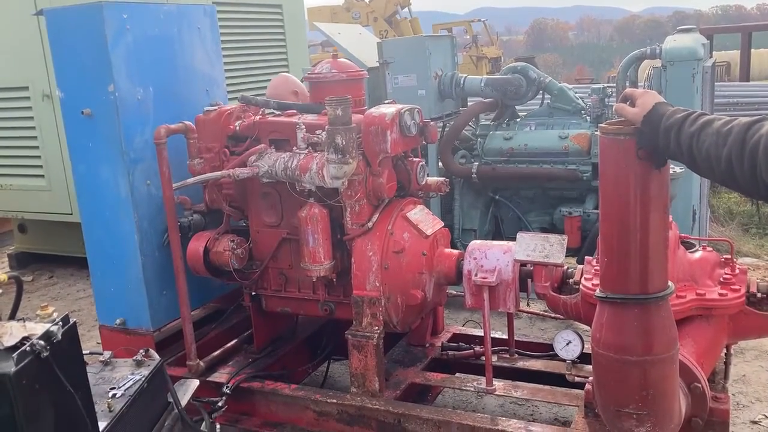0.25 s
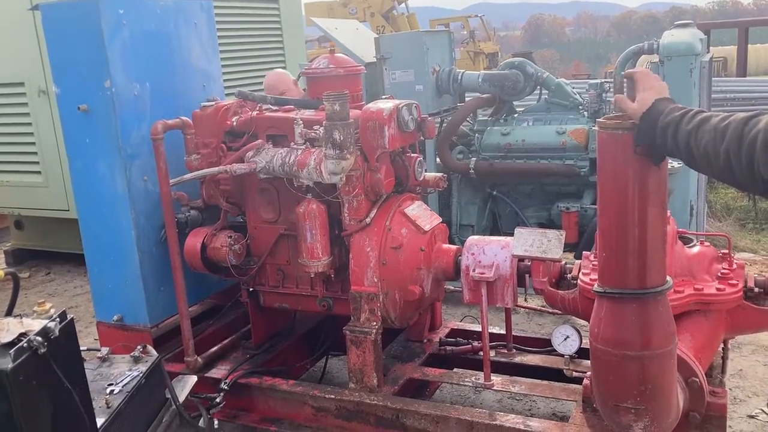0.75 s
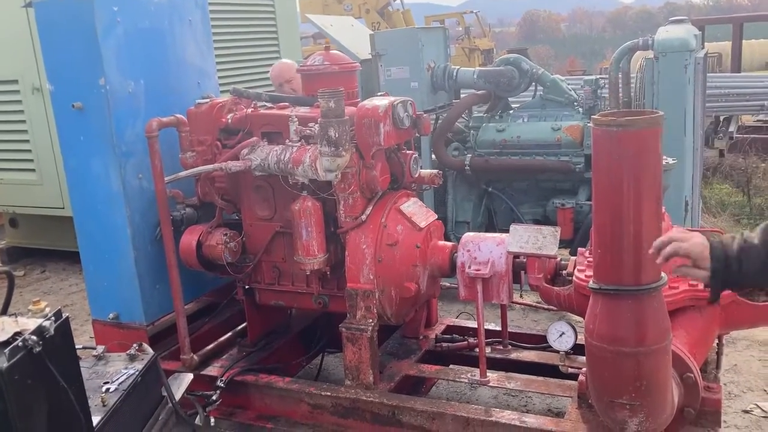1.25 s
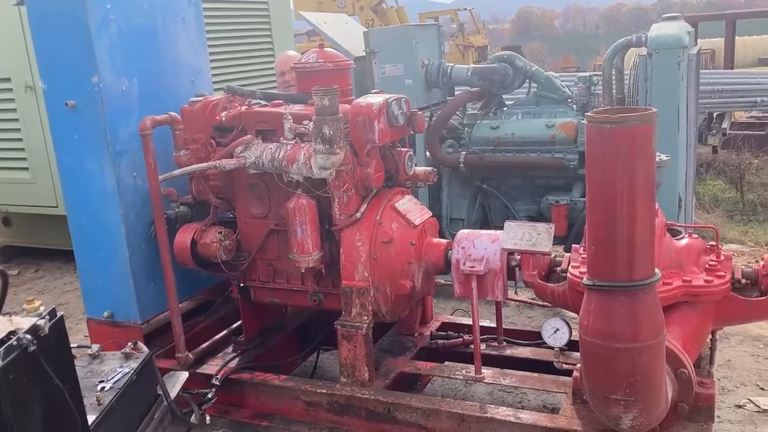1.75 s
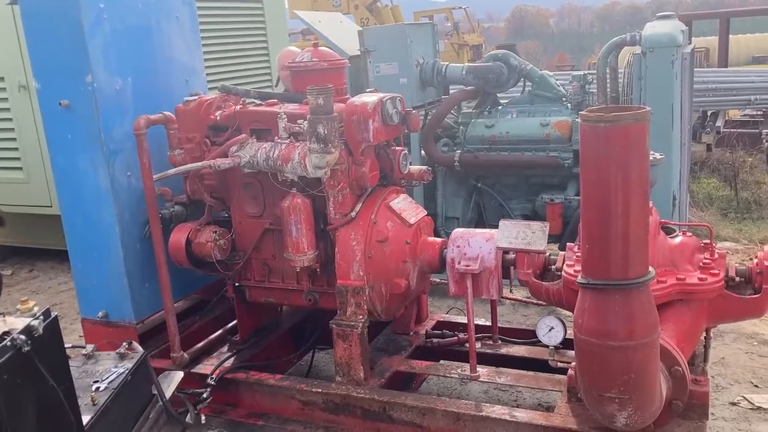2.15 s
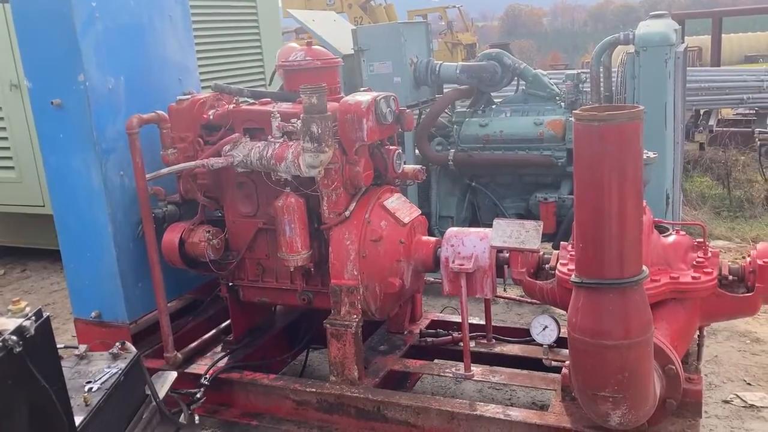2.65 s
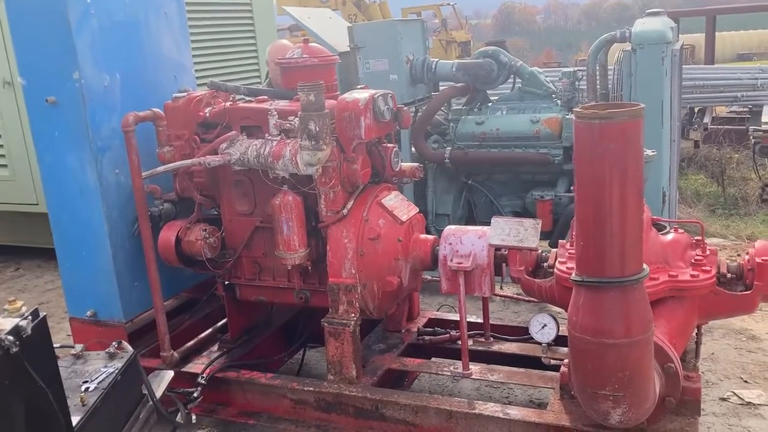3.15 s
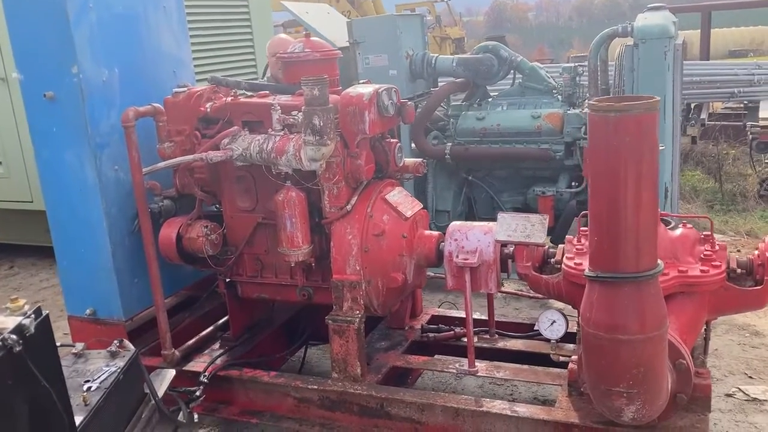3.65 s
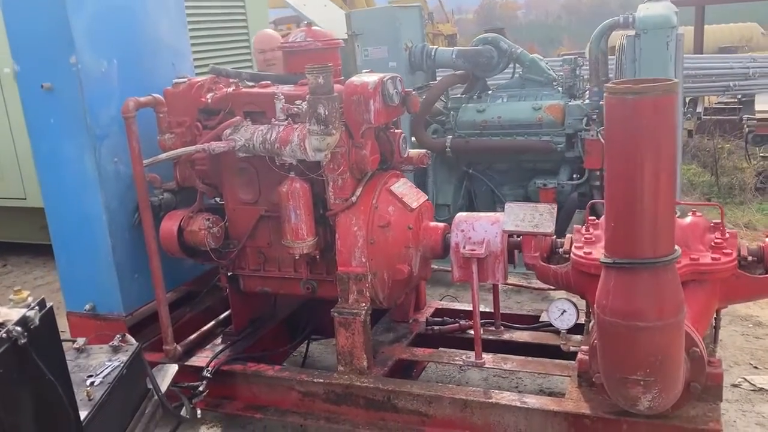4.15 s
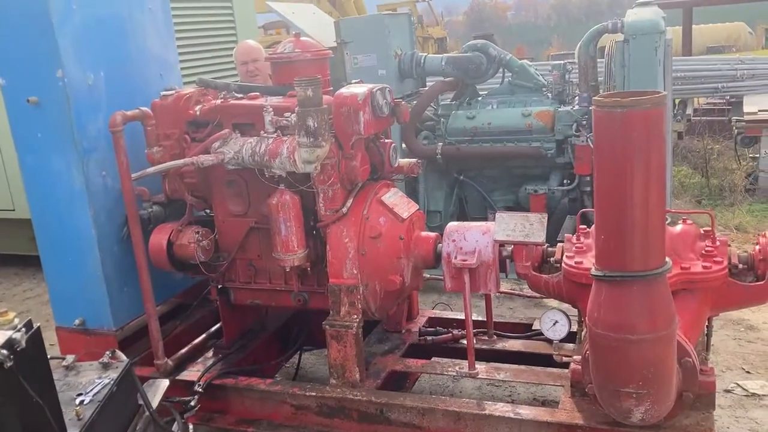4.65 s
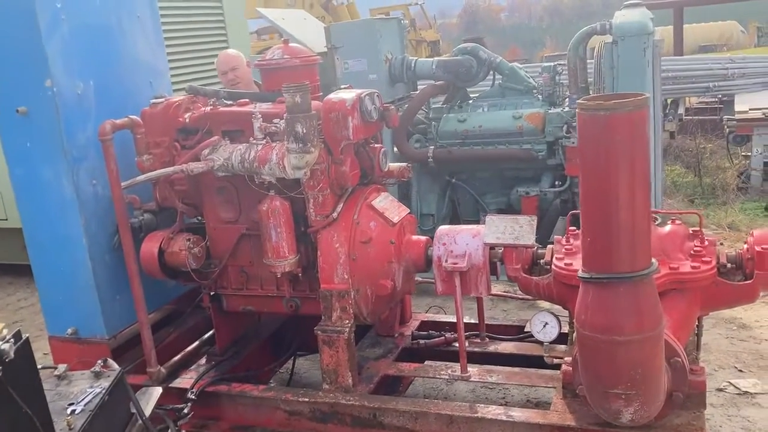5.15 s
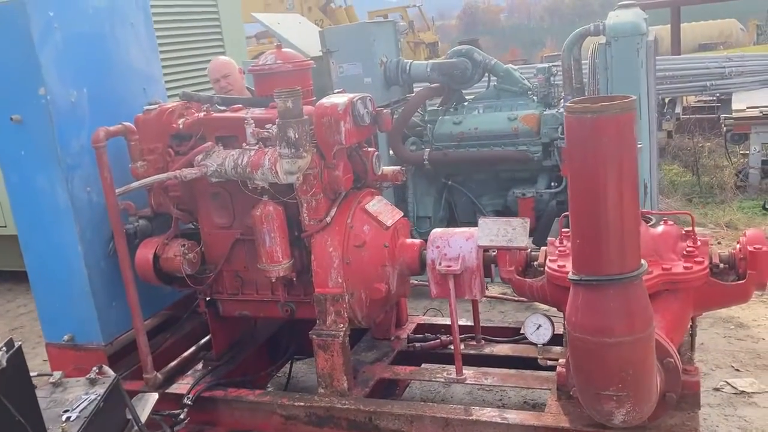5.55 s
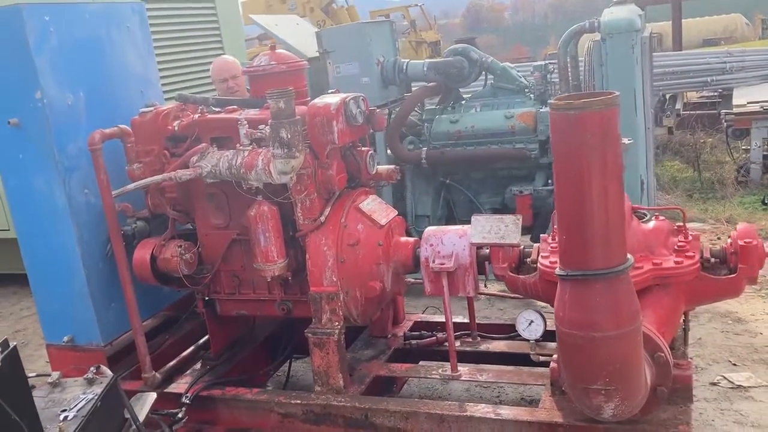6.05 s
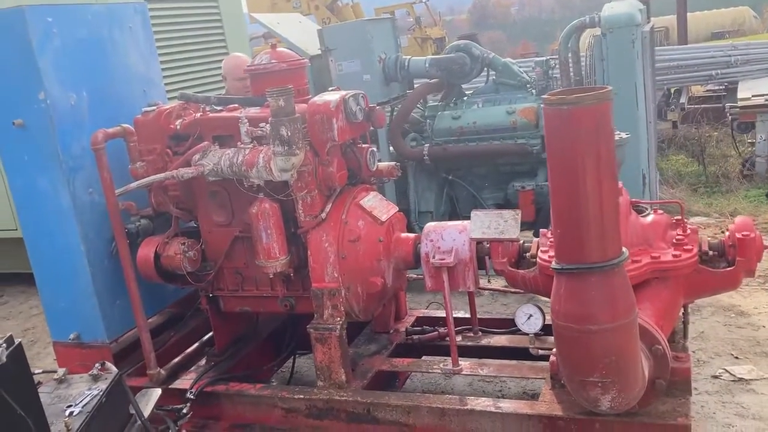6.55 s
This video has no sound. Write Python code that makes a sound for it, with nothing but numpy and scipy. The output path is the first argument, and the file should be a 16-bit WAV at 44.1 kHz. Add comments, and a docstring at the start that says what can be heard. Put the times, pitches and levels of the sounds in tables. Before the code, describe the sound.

A close two-stroke diesel pulls up hard, coasts, is throttled up twice to a higher, barking roar, then begins dropping off.

```python
"""The exhaust of a three-cylinder two-stroke diesel drones and barks, heard close by on a pump skid in an open yard.
It has just caught and pulls up to speed, coasts, is given fuel twice more and coasts again.
Firing pulses drive a pipe filter, knocks ring the block, the geared blower hums and hisses,
and injectors tick sharply under load. Fuel and crank speed set every part's level, crank angle its pitch or rhythm.
One soft low bump is added."""
import sys
import numpy as np
from scipy import signal
from scipy.fft import rfft, irfft, next_fast_len
from scipy.io import wavfile
from scipy.ndimage import uniform_filter1d, map_coordinates

SR = 44100
rng = np.random.default_rng(int(sys.argv[2]) if len(sys.argv) > 2 else 0)


def to_wav(s):
    """Save 16-bit WAV."""
    ch = np.atleast_2d(s).T  # columns
    pcm = np.round(np.clip(ch, -1, 1) * 32767)  # PCM
    wavfile.write(sys.argv[1], SR, pcm.astype(np.int16))


N = 300321
TIME = np.arange(N) / SR

# cylinders: crank angle/turns, knock/dB per unit of (4.5 + load), injector tick/dB
CYLINDERS = [(.0, -3.5, 4.5), (.325, -2, -1), (0.652, -6, -2)]


def from_db(db):
    """Amplitude ratio of a level in dB."""
    return 10 ** (np.asarray(db) / 20)


def rms_one(x):
    """Scale to an overall rms of 1."""
    return x / np.sqrt(np.mean(x ** 2) + 1e-20)


def in_time(rows):
    """Each column of a curve, sample by sample."""
    time_s, *columns = np.transpose(rows)
    return [np.interp(TIME, time_s, column) for column in columns]


def at_hz(points, hz):
    """A curve over frequency, read on a log-frequency axis."""
    point_hz, value = np.array(points).T
    return np.interp(np.log(hz + 1), np.log(point_hz), value)


def evened(x, span_samples=5000):
    """Divide by the moving rms, common to all channels."""
    power = np.mean(np.atleast_2d(x) ** 2, axis=0)
    smooth = uniform_filter1d(uniform_filter1d(power, span_samples), span_samples // 2)
    return x / np.sqrt(smooth + 1e-20)


def cut(x, hz, kind, order=4):
    """Butterworth low- or high-pass."""
    return signal.sosfilt(signal.butter(order, hz, kind, fs=SR, output="sos"), x)


def body(x, spectrum, modes=(), size=8192):
    """Minimum-phase filter: a broad spectrum plus narrow peaks or nulls."""
    hz = np.arange(size // 2 + 1) * SR / size
    db = at_hz(spectrum, hz)
    for mode_hz, width_hz, mode_db in modes:
        db = db + mode_db / (1 + (2 * (hz - mode_hz) / width_hz) ** 2)
    # folding the cepstrum makes the response causal
    cepstrum = irfft(np.log(from_db(db)))
    cepstrum[1:size // 2] *= 2
    cepstrum[size // 2 + 1:] = 0
    response = irfft(np.exp(rfft(cepstrum)))
    return signal.oaconvolve(np.atleast_2d(x), response[None], axes=1)[:, :N]


def stereo_noise(size):
    """White noise whose left-right correlation depends on frequency."""
    # left-right correlation: f/Hz, correlation/0-1
    likeness = [(300, 1), (700, 0.65), (1400, 0.44), (3000, 0.73), (6000, 0.69)]
    mid, side = rfft(rng.standard_normal((2, size)))
    alike = np.clip(at_hz(likeness, np.arange(len(mid)) * SR / size), 0, 1)
    return irfft(np.sqrt(1 + alike) * mid + np.sqrt(1 - alike) * side * [[1], [-1]], size)


def late(x, ms):
    """A short travel delay, to a fraction of a sample."""
    size = next_fast_len(N + 100)
    hz = np.arange(size // 2 + 1) * SR / size
    return irfft(rfft(x, size) * np.exp(-2j * np.pi * hz * ms / 1000), size)[:N]


def drift(knots_per_s, size=2000):
    """Slow chance of spread 1: a spline through random knots."""
    knots = rng.standard_normal(400)
    coarse_s = np.linspace(0, TIME[-1], size)
    wander = map_coordinates(knots, [coarse_s * knots_per_s], order=3, mode="wrap")
    return np.interp(TIME, coarse_s, wander)


def firings(crank, angle_turns, spread_db, jitter_ms):
    """One click a turn at a crank angle, each a little different in strength and time."""
    turns = np.arange(int(crank[-1])) + angle_turns % 1
    chance = rng.standard_normal((len(turns), 2))
    at_s = np.interp(turns, crank, TIME) + chance[:, 0] * jitter_ms / 1000
    clicks = np.zeros(N)
    clicks[np.clip((at_s * SR).astype(int), 0, N - 1)] = from_db(spread_db * chance[:, 1])
    return clicks


def dying(clicks, t60_s):
    """Exponential envelope after each click."""
    return signal.lfilter([1], [1, -from_db(-60 / (t60_s * SR))], clicks + 1e-18)


def loudness(voice, fuel, speed, cruise_turns_per_s=35):
    """Level of a voice in dB: it follows the fuel and tilts with the speed."""
    coasting_db, load_db, slow_db, fast_db = voice
    octaves = np.log2(speed / cruise_turns_per_s)
    return coasting_db + load_db * fuel + np.where(octaves < 0, slow_db, fast_db) * octaves


def exhaust(crank, load, speed, drone_db, bark_db, angle_turns=0.2406, slow_phase_rad=1.0, fast_phase_rad=2.48,
            coast_rough_db=-24, pull_rough_db=-18):
    """Gas pulses and their turbulence pass down the pipe, whose null parts the drone from the bark."""
    # unequal cylinders give every crank order: order/per turn, coasting/dB, pulling/dB
    exhaust_orders = [(1, -2, -32), (2, -1, 0), (3, 11.5, 19.5), (4, 2.5, 0), (5, 7, 6), (6, 5.5, 15),
                      (7, 7.5, 10.5), (8, 13.5, 5.5), (9, 7, 9.5), (10, 1.5, 4), (11, 6.5, 3), (12, -1, -1),
                      (13, -11.5, -4), (14, -10.5, -1), (15, -12.5, -7), (16, -31, 0), (17, -20, -3),
                      (18, -4.5, -1.5), (19, -52, 6), (20, -36, -3)]
    # pipe and silencer: f/Hz, level/dB
    pipe = [(25, -64), (60, -20), (95, -1.5), (140, -7), (200, -5), (280, 4.5), (400, -2.5), (500, -7),
            (650, 0.5), (850, -14.5), (1100, -21.5)]
    # standing waves and nulls of the pipe: f/Hz, width/Hz, level/dB
    pipe_modes = [(113, 13, -7), (153.5, 12.6, 7.5), (205, 37, 8), (250, 37, 6), (312.6, 62, -21),
                  (336.2, 18.2, 11.5), (373, 3.1, 7), (388.8, 4.3, -6.5), (467.7, 117, 11.5),
                  (516, 60, 1.5), (552, 4.6, -60), (596, 19, -20), (585, 57, 6.5), (855, 11, -15)]
    angle_rad = 2 * np.pi * (crank - angle_turns)
    # a slow engine lopes on one strong puff; with speed the in-between orders shift and three puffs share the turn
    shift_rad = np.interp(speed, [26, 34], [slow_phase_rad, fast_phase_rad])
    pulses = 0
    for order, coast_db, pull_db in exhaust_orders:
        in_between = bool(order % len(CYLINDERS))
        level = from_db(coast_db + (pull_db - coast_db) * load)
        pulses = pulses + level * np.cos(order * angle_rad + shift_rad * in_between)
    pulses = rms_one(pulses)
    turbulence = rms_one(cut(rng.standard_normal(N), 670, "low") * (1 + np.abs(pulses)))
    rough = from_db(coast_rough_db + (pull_rough_db - coast_rough_db) * load)
    gas = body(pulses + rough * turbulence, pipe, pipe_modes)[0]
    drone = from_db(drone_db) * evened(cut(gas, 334.0, "low", order=8))
    bark = from_db(bark_db) * evened(cut(gas, 335.3, "high", order=8))
    left = drone * from_db(1.5) + bark * from_db(-2.2)
    right = late(drone * from_db(0.5) + bark * from_db(-2.06), ms=0.14)
    return np.array([left, right])


def boom(load, speed, order=11, mode_hz=374, width_hz=5.2, peak_db=4.5):
    """Extra bark in dB as one crank order crosses a pipe resonance; strong gas flow damps it."""
    detuning = 2 * (order * speed - mode_hz) / width_hz
    return peak_db * (1 - load) / (1 + detuning ** 2)


def block(crank, load, knock_db, ring_t60_s=0.19, crack_t60_s=0.0081, crack_db=8, ring_db=-4, rattle_t60_s=0.27,
          rattle_db=-5, pull_db=9, air_db=-6, gear_pull_db=6, size=4000):
    """Each cylinder rings the casting's dense modes in its own way, harder under load; loose parts rattle after."""
    # casting: f/Hz, level/dB
    casting = [(300, -24.5), (560, -17.5), (660, -1.5), (950, -6.5), (1450, -2), (2000, -11), (2700, -12.5),
               (3100, -13.5), (3900, -13.5), (5000, -15), (6200, -23), (8000, -47), (16000, -41)]
    # ringing of block and covers: f/Hz, width/Hz, level/dB
    casting_modes = [(635, 120, 4), (749, 11.3, -27), (827, 200, 3), (927, 33, 4), (1103.5, 86, 9.5),
                     (1232, 54, -9.5), (1370, 20, 5.5), (1580, 22, -3), (1785.6, 44, -20.5), (1825, 66, 13),
                     (2173, 50, 8), (2330, 33, 5.5), (2567, 44, 8.5), (2720, 40, 9.5), (3595, 100, 3),
                     (4150, 21, 5.5)]
    age_s = np.arange(size) / SR
    decay = from_db(-60 * age_s / ring_t60_s) + from_db(crack_db - 60 * age_s / crack_t60_s)
    ringing, shake = 0, 0
    for angle_turns, db_per_unit, _ in CYLINDERS:
        blows = firings(crank, angle_turns - .04, spread_db=3.5, jitter_ms=0.014)
        blows = blows * from_db(db_per_unit * (4.5 + load))
        ringing = ringing + signal.oaconvolve(blows[None], stereo_noise(size) * decay, axes=1)[:, :N]
        shake = shake + dying(blows, rattle_t60_s)
    noise = stereo_noise(2 * next_fast_len(N // 2 + 1))[:, :N]
    loose = noise * (from_db(rattle_db) * evened(shake) + from_db(air_db))
    knocks = from_db(ring_db + pull_db * load) * evened(ringing)
    gears = from_db(gear_pull_db * load) * gear_train(crank)
    left, right = from_db(knock_db - 0.34) * evened(body(knocks + gears + loose, casting, casting_modes))
    return np.array([left * from_db(2.0), late(right, ms=0.083) * from_db(0.15)])


def gear_train(crank, whirr_db=-7, whine_db=-10.5, waver_db=4.5, size=1200):
    """Gears, blower lobes and valves repeat their contacts every turn: wavering lines glide with the speed."""
    # gears and lobes that sing out: order/per turn, level/dB
    whine_orders = [(17, 5), (18, 1.5), (19, -2.5), (20, -2.5), (21, -0.5), (24, -8), (26, -2.5), (27, -4),
                    (29, 0), (30, -5.5), (31, -7.5), (32, -0.5), (34, -5), (35, -5.5), (38, -2), (41, -7)]
    meshing_rad = 0.74 * drift(2.552)
    whirr = 0
    # two contact patterns, slowly blended
    for blend in np.cos(meshing_rad), np.sin(meshing_rad):
        pattern = stereo_noise(size)
        turned = [np.interp(crank % 1 * size, np.arange(size), side) for side in pattern]
        whirr = whirr + blend * np.array(turned)
    whine = 0
    for order, db in whine_orders:
        level = from_db(db + waver_db * drift(5))
        whine = whine + level * np.cos(2 * np.pi * (order * crank + rng.random()))
    whirr = rms_one(cut(whirr, 2000, "low", order=2))
    return from_db(whirr_db) * whirr + from_db(whine_db) * rms_one(whine)


def injectors(crank, load, injector_db, tick_t60_s=0.0091, coast_tick_db=-7, pull_tick_db=10.5, diffuse_db=-17):
    """A bright noise snap at each firing stands out of the blower hiss as the load rises."""
    # injector tick: f/Hz, level/dB
    tick_spectrum = [(2000, -27), (4000, -25), (6500, -7), (7500, 1), (8400, 6), (9500, -2), (11000, -2.5),
                     (13000, -9.5), (16000, -9)]
    # blower hiss: f/Hz, level/dB
    hiss_spectrum = [(3000, -19), (5500, 3.5), (7600, 9), (11000, 7.5), (13000, 3), (16000, -7)]
    snaps = 0
    for angle_turns, _, tick_db in CYLINDERS:
        snaps = snaps + firings(crank, angle_turns, spread_db=2.5, jitter_ms=0.13) * from_db(tick_db)
    envelope = dying(snaps, tick_t60_s) + 0.22 * dying(snaps, t60_s=0.044) + 0.11
    tick_noise, hiss_noise = rng.standard_normal((2, 3, N))
    ticks = evened(body(tick_noise * envelope, tick_spectrum))
    hiss = rms_one(body(hiss_noise, hiss_spectrum))
    share = from_db(coast_tick_db + (pull_tick_db - coast_tick_db) * load)
    mix = (share * ticks + hiss) / np.sqrt(1 + share ** 2)
    direct, *scattered = from_db(injector_db + 3.5) * mix
    # the treble reaches the left side later and in opposite phase
    return np.array([-late(direct, ms=0.2199), direct]) + from_db(diffuse_db) * np.array(scattered)


def blower(crank, blower_db, waver_db=2, gear_ratio=1.95):
    """Rotors geared up from the crank hum between its orders, beat against the exhaust and coarsen it."""
    # rotor hum: order/per rotor turn, level/dB
    rotor_orders = [(5, 4), (6, 0.5), (7, 2.5), (9, -15), (10, -12), (12, -13), (14, -7)]
    hum = 0
    for order, db in rotor_orders:
        level = from_db(db + waver_db * drift(3.82))
        hum = hum + level * np.cos(2 * np.pi * (order * gear_ratio * crank + rng.random()))
    hum = from_db(blower_db) * rms_one(hum)
    return np.array([hum, late(hum, ms=0.086)])


def bumps(width_s=0.00055):
    """A dull, short Gaussian pressure bump, alike on both sides."""
    # soft low bump: t/s, peak/dB
    bump_rows = [(6.265, -10)]
    return sum(from_db(db) * np.exp(-((TIME - at_s) / width_s) ** 2) for at_s, db in bump_rows)


def scene():
    """Fuel and crank speed drive exhaust, block, injectors and blower together."""
    # crankshaft: t/s, speed/turns per s
    speed_curve = [(0.0, 24.24), (0.72, 33.71), (0.9, 35.51), (1.2, 35.35), (1.52, 35.55), (1.78, 35.29),
                   (2.23, 34.28), (2.61, 33.85), (3.42, 32.38), (3.65, 33.31), (3.99, 37.55), (4.38, 39.25),
                   (4.79, 43.31), (5.16, 44.71), (5.67, 47.66), (5.89, 48.87), (6.05, 48.18), (6.81, 44.73)]
    # fuel rack: t/s, load/1 (0 coasting, 1 full fuel, below 0 shut off)
    fuel_curve = [(0, 0.75), (.84, 0.84), (1.03, -0.15), (1.22, 0.27), (1.56, 0.082), (3.3, 0.007),
                  (3.52, 0.17), (3.69, 0.9), (3.93, 1), (4.11, 0.37), (4.37, .52), (4.49, 0.92),
                  (4.7, 0.84), (4.89, 0.5), (5.27, .68), (5.87, .6), (5.97, 0.18), (6.81, .03)]
    # voices: coasting at cruise speed/dB, added by full load/dB, below cruise/dB per octave, above/dB per octave
    drone_voice = (-23, 6.5, -5, -11)
    bark_voice = (-27, 14.5, 2, 5.5)
    knock_voice = (-28.5, 10.5, -6.5, -4)
    injector_voice = (-47.5, 17.5, -4, 1.5)
    blower_voice = (-40.5, 7, 8, 24.5)
    speed, = in_time(speed_curve)
    fuel, = in_time(fuel_curve)
    load = np.clip(fuel, 0, 1)
    crank = np.cumsum(speed) / SR  # turns
    drone_db = loudness(drone_voice, fuel, speed)
    bark_db = loudness(bark_voice, fuel, speed) + boom(load, speed)
    engine = exhaust(crank, load, speed, drone_db, bark_db)
    engine = engine + block(crank, load, loudness(knock_voice, fuel, speed))
    engine = engine + injectors(crank, load, loudness(injector_voice, fuel, speed))
    engine = engine + blower(crank, loudness(blower_voice, fuel, speed))
    return engine + bumps()


def record(dry, ceiling=.88, cutoff_hz=15900):
    """Clip the highest peaks, then cut the top with a steep low-pass."""
    held = np.clip(dry, -ceiling, ceiling)
    return signal.sosfilt(signal.ellip(10, .2, 80, cutoff_hz, fs=SR, output="sos"), held)


dry = scene()
out = record(dry)
to_wav(out)
```